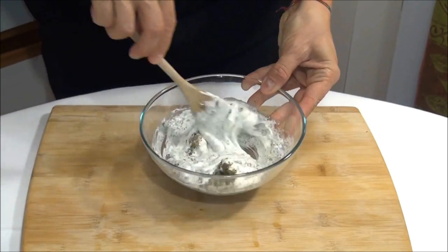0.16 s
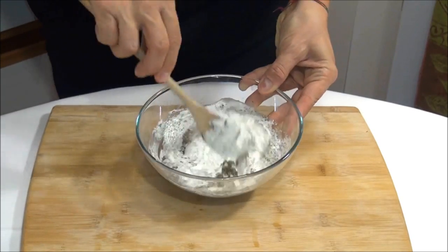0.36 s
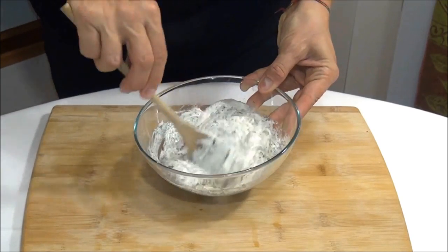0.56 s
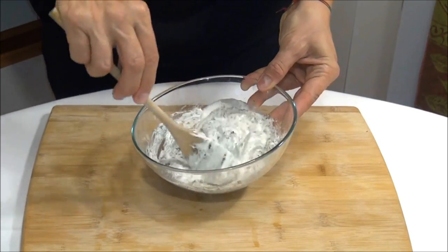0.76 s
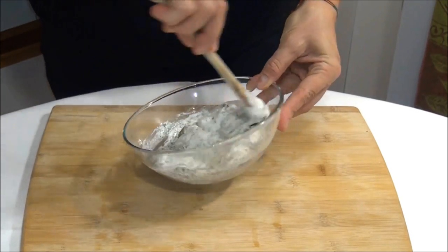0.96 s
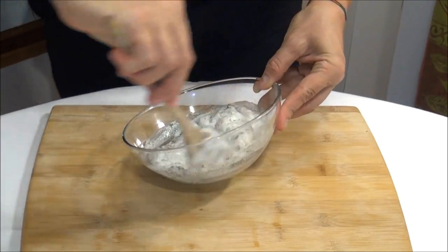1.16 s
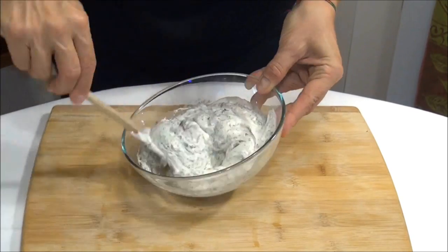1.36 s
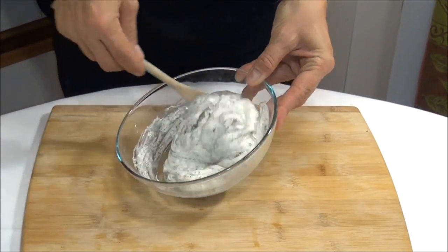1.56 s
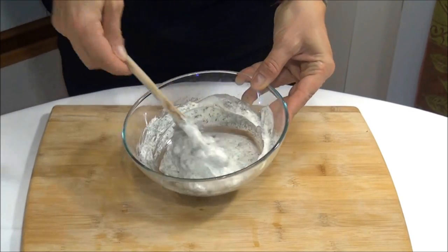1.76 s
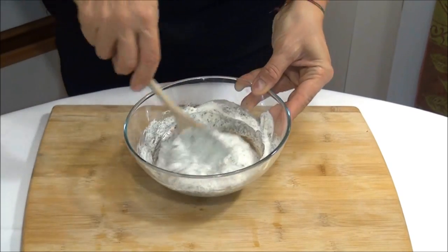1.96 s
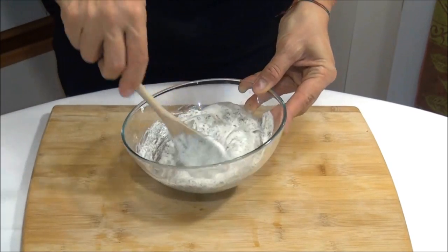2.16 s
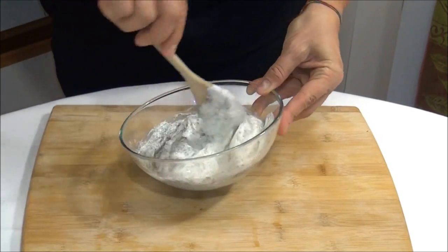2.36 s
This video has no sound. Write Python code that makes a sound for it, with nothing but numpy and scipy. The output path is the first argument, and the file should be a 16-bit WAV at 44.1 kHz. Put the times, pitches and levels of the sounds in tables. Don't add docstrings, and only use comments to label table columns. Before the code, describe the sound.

A wooden spoon knocks a filled glass bowl at uneven intervals, loudest early on, with dull board thumps, small wet smacks and faint dragging, close up in a small echoing kitchen over low hum.

```python
import sys
import numpy as np
from scipy import signal
from scipy.fft import rfft, irfft
from scipy.io import wavfile
from scipy.ndimage import uniform_filter1d

SR = 44100
rng = np.random.default_rng(int(sys.argv[2]) if len(sys.argv) > 2 else 0)


def amp(db):
    return 10 ** (np.asarray(db, float) / 20)


def write(x):
    x = np.atleast_2d(x).T
    wavfile.write(sys.argv[1], SR, np.round(np.clip(x, -1, 1) * 32767).astype(np.int16))


N = 110250

# [start_s, level_db (peak), pitch_hz (contact), board_db (thump), ring_cycles]
SPOON_KNOCKS = [(0.02, -45, 790, -9.5, 13.8), (0.0803, -40, 800, -7, 5.7), (0.1512, -31.5, 900, -19, 6),
                (0.3817, -46.5, 1140, -33, 15), (0.3866, -16.5, 1047, -28.5, 4.74),
                (.6145, -30, 826, -19, 4.2), (.651, -34.5, 900, -23, 2.3), (0.811, -31.5, 500, -15, 2.36),
                (0.879, -37, 1730, -30, 3.6), (1.045, -40.5, 726, -22, 4.3), (1.1922, -47, 1064, -38, 9.4),
                (1.376, -35.5, 1600, -19, 1.6), (2.0037, -32, 756, -14.5, 6.9),
                (2.068, -41, 1950, -51, 12.7), (2.2219, -24, 923, -27, 3.08), (2.361, -53, 725, -10, 6.9)]
# [pitch_hz, level_db, t60_s]
BOWL_MODES = [(645, -22, 0.016), (800, -28, 0.052), (815, 0.5, 0.05), (915, -2.5, 0.068), (1034, -7, 0.031),
              (1185.5, 3, 0.052), (1330, 4.5, 0.037), (1518, 1.5, 0.018), (1540, -19, 0.022),
              (1732, 7.5, 0.013), (2090, -19, 0.14)]
# [pitch_hz, level_db, t60_s]
BOARD_MODES = [(190, -10, .06), (231, 0, .11), (276, -4, .1), (380, -10, .07), (500, -4, .07)]
# [pitch_hz, level_db, t60_s]
RIM_MODES = [(2460, -27, .04), (3760, -42, .04), (5250, -26, .05), (6960, -27, .04), (8860, -32, .04),
             (10900, -36, .03)]
# [start_s, level_db (peak), centre_hz, width_octaves]
PASTE_SMACKS = [(0.019, -54.5, 10800, 0.39), (0.1507, -36.5, 9140, 1.04), (0.1511, -37.5, 2500, 1.42),
                (.162, -65, 9500, .6), (.176, -49, 12600, 0.35), (0.208, -56, 4430, 1.1),
                (0.3878, -22.5, 1660, 1.08), (.3865, -31, 5700, 1.23), (0.423, -55, 11500, 0.21),
                (0.435, -49.5, 7500, 0.71), (.654, -39, 2240, 0.66), (.692, -52, 7900, 0.65),
                (.811, -38, 2130, 0.7), (0.812, -45, 8700, 1.1), (0.881, -48.5, 2710, 0.99),
                (1.047, -44.5, 2480, 1.5), (1.375, -51, 5210, 0.18), (1.2985, -54, 11100, 0.56),
                (.3868, -37.5, 4300, 0.34), (1.322, -48, 9200, 0.82), (1.376, -32.5, 2060, 0.95),
                (1.546, -54, 4500, 0.97), (1.591, -49.5, 2900, 0.79), (1.655, -57, 11000, 0.52),
                (1.71, -52, 4560, 0.45), (2.054, -43, 7000, 5.1), (2.064, -41, 8400, 0.35),
                (2.0674, -27.5, 9000, 3.5), (2.068, -30.5, 7900, 10), (2.069, -37, 2250, 0.99),
                (2.2237, -32.5, 2340, 2.2), (2.36, -46, 6970, 2.4)]
# [start_s, length_s, rim_db, paste_db]
SPOON_SLIDES = [
    (0.146, 0.091, -90, -70),
    (0.803, 0.063, -85, -58.5),
    (1.194, 0.015, -67, -83),
    (1.245, 0.023, -60.5, -73),
    (1.275, 0.028, -66, -67),
    (2.059, 0.017, -90, -43),
    (2.363, 0.015, -89.5, -63),
]
# [start_s, level_db]
STIR_LEVEL = [(0.0, -56.5), (0.08, -67.5), (0.21, -65), (0.44, -80), (0.56, -66), (0.7, -81), (0.84, -71),
              (1.15, -77), (1.59, -64.5), (1.75, -73.5), (2.03, -85), (2.21, -69.5), (2.35, -65.5),
              (2.5, -79)]
# [pitch_hz, level_db per Hz]
DRAG_COLOUR = [(150, 4), (400, -5), (900, 2), (1600, -7), (3000, -10), (6000, -30)]
# [pitch_hz, level_db per Hz]
AIR_COLOUR = [(41, -24), (70, -17), (166, -10.5), (403, -15), (593, -20), (1000, -25.5), (1510, -26),
              (3040, -32.5), (16000, -38)]
# [pitch_hz, t60_s]
ROOM_DECAY = [(100, 1), (300, 0.33), (800, 0.35), (2000, 0.26), (5000, 0.27), (12000, 0.087)]
# [pitch_hz, left_minus_right_db]
STEREO_LEAN = [(60, -4.5), (130, -5), (290, 0.5), (640, 2.0), (1410, 1.0), (3100, 1.5), (6820, 1),
               (15000, 0.5)]
# [pitch_hz, level_db]
STEREO_WIDTH = [(100, -18.5), (1000, -23.5), (3500, -61), (5500, -12.5), (9000, -12.5), (11500, -19.5),
                (13000, -60)]
# [start_s, level_db (peak), pitch_hz, ring_cycles]
LONE_RINGS = [(.3866, -16, 815, 22), (.3905, -23, 930, 45), (.3875, -31, 227.4, 22), (.3875, -22, 1330, 39),
              (.392, -29, 1500, 77), (.3965, -37, 990, 6.9), (2.006, -32.5, 915, 55),
              (2.0085, -35, 665, 25), (2.011, -42.5, 1184, 98), (2.0125, -33, 800, 13),
              (2.075, -37, 1700, 33), (.083, -31.5, 890, 15.7), (.1, -34.5, 283, 24), (.046, -46, 252, 6),
              (.153, -25, 534, 8.3), (.158, -35.5, 1210, 73), (.2, -39, 450, 22), (.21, -45.5, 1152, 70),
              (.615, -37.5, 221, 17), (.651, -42, 851, 28), (.657, -35, 1158, 32), (.6535, -34.5, 2010, 27),
              (.66, -42, 228, 7.5), (1.38, -35, 915, 72), (1.383, -35, 1174, 40), (1.375, -37, 1709, 73),
              (1.382, -57, 246, 8), (1.403, -34.5, 238, 6), (2.2215, -31.5, 850, 21),
              (2.235, -40, 235, 18.6), (2.24, -53, 1050, 40), (1.046, -38.5, 1347, 38),
              (.0805, -29, 235, 27), (.811, -47, 2290, 86), (.88, -40.5, 1842, 120),
              (1.1905, -50, 2530, 49), (1.375, -36, 2400, 49), (2.2215, -32, 2465, 80),
              (2.36, -47, 2740, 41), (.07, -51, 129, 5.1), (.19, -46.5, 136.5, 68), (.40, -42.5, 152, 21),
              (.66, -44, 143, 10), (.83, -46, 146, 17), (1.39, -45, 134.4, 38), (2.03, -45, 139, 19),
              (2.25, -42.5, 143, 26)]

HUM_HZ, HUM_DB, HUM_WOBBLE_DB = 59.3, -58.5, 2.5
AIR_DB = -60
SLIPS_PER_S, CRACKLE_PER_S = 1800, 3100
CONTACT_DB, BODY_DB, BOARD_DB = 10, -14.5, 2
OFF_PITCH_DB = 11.0
DULL_DB = 4
SMACK_T60_S, SMACK_ROUGH = 0.009, 0.55
RINGS_ROOM_DB = -9
ROOM_DB, ROOM_ONSET_S = 3, 0.005
EARLY_DB, EARLY_T60_S = 10, 0.075
PLACES = 12
TOP_HZ = 15900


def rms_one(x):
    return x / np.sqrt(np.mean(x ** 2) + 1e-20)


def at_hz(points, hz):
    points = np.array(points)
    return np.interp(np.log(hz + 1), np.log(points[:, 0]), points[:, 1])


def colour(x, points, share=1):
    gain = amp(share * at_hz(points, np.fft.rfftfreq(N, 1 / SR)))
    return irfft(rfft(x) * gain, N)


def bandpass(x, edges, order=2):
    return signal.sosfilt(signal.butter(order, edges, "band", fs=SR, output="sos"), x)


def drift(rate_hz):
    r = np.exp(-2 * np.pi * rate_hz / SR)
    wander = signal.lfilter([1], [1, -2 * r, r * r], rng.standard_normal(N + SR))
    return rms_one(wander[SR:])


def grains(per_s):
    hits = rng.random(N) < per_s / SR
    sizes = amp(3.5 * np.minimum(rng.exponential(1, N), 3))
    return rms_one(hits * sizes * rng.choice([-1, 1], N))


def ring(clicks, hz, t60):
    r, w = amp(-60 / (t60 * SR)), 2 * np.pi * hz / SR
    return signal.lfilter([0, np.sin(w)], [1, -2 * r * np.cos(w), r * r], clicks + 1e-18)


def strike(modes, start_s, db_at, spread_db):
    out = 0
    chance = rng.standard_normal((len(start_s), len(modes)))
    for k, (hz, level_db, t60) in enumerate(modes):
        clicks = np.zeros(N)
        clicks[(start_s * SR).astype(int)] = amp(db_at(hz) + level_db + spread_db * chance[:, k])
        out = out + ring(clicks, hz, t60) * (-1) ** k
    return out


def blips(rows):
    size = 16384
    out, t = np.zeros(N + size), np.arange(size) / SR
    for s, db, hz, cycles in rows:
        swell = (1 - np.exp(-4.0 * hz * t)) ** 2
        decay = amp(-60 * hz * t / max(cycles, 1))
        out[int(s * SR):int(s * SR) + size] += amp(db) * swell * decay * np.sin(2 * np.pi * hz * t)
    return out[:N]


def air():
    return colour(rng.standard_normal(N), AIR_COLOUR)


def background():
    level = amp(HUM_DB + HUM_WOBBLE_DB * drift(27))
    phase = 2 * np.pi * HUM_HZ * np.arange(N) / SR + 1.0 * drift(0.96)
    low_cut = signal.butter(4, 70, "high", fs=SR, output="sos")
    return level * np.sin(phase) + amp(AIR_DB) * rms_one(signal.sosfilt(low_cut, air()))


def drag():
    s, db = np.transpose(STIR_LEVEL)
    effort_db = np.interp(np.arange(N) / SR, s, db) - 1.5 + 2 * drift(47)
    return amp(effort_db) * rms_one(colour(grains(3400), DRAG_COLOUR))


def smacks():
    size = 1024
    out, t = np.zeros(N + size), np.arange(size) / SR
    for s, db, hz, octaves in PASTE_SMACKS:
        edges = np.clip(hz * 2 ** (np.array([-0.5, 0.5]) * octaves), 100, 20000)
        noise = rng.standard_normal(size) * amp(-60 * t / SMACK_T60_S)
        puff = bandpass((t == 0) + SMACK_ROUGH / 4 * noise, edges, order=3)
        out[int(s * SR):int(s * SR) + size] += amp(db) * puff / np.abs(puff).max()
    return out[:N]


def knocks():
    s, db, pitch, board_db, cycles = np.transpose(SPOON_KNOCKS)

    def bowl_db(hz):
        octaves = np.log2(hz / pitch)
        return db + BODY_DB - OFF_PITCH_DB * np.abs(octaves) - DULL_DB * np.maximum(octaves, 0)

    contact = blips(zip(s, db + CONTACT_DB, pitch, cycles))
    body = strike(BOWL_MODES, s, bowl_db, spread_db=6.0)
    thump = strike(BOARD_MODES, s, lambda hz: db + board_db + BOARD_DB, spread_db=5)
    return contact + body + thump


def lone_rings():
    return blips(LONE_RINGS)


def slides():
    t, rim, paste = np.arange(N) / SR, 0, 0
    for s, length, rim_db, paste_db in SPOON_SLIDES:
        fade_in, fade_out = (t - s) / 0.004, (s + length - t) / (0.6 * length)
        gate = np.clip(np.minimum(fade_in, fade_out), 0, 1)
        rim = rim + amp(rim_db) * gate
        paste = paste + amp(paste_db) * gate
    slips = grains(SLIPS_PER_S) * rim
    sing = sum(amp(db) * ring(slips, hz, t60) for hz, db, t60 in RIM_MODES)
    crackle = bandpass(grains(CRACKLE_PER_S), [4000, 11000])
    return amp(2.0) * sing + paste * crackle


def echoes():
    t, tail = np.arange(SR // 2) / SR, 0
    edges = 80 * 2 ** np.arange(0, 8, 0.5)
    for low, high in zip(edges, edges[1:]):
        band = bandpass(rng.standard_normal(len(t)), [low, high])
        tail = tail + band * amp(-60 * t / at_hz(ROOM_DECAY, np.sqrt(low * high)))
    spectrum = rfft(tail * (1 + amp(EARLY_DB - 60 * t / EARLY_T60_S)))
    smooth_power = uniform_filter1d(np.abs(spectrum) ** 2, size=25)
    tail = irfft(spectrum / np.sqrt(smooth_power + 1e-9), len(t))
    tail = tail * np.clip(t / ROOM_ONSET_S - 0.5, 0, 1) * (t < 0.45)
    return tail / np.sqrt(np.sum(tail ** 2))


def kitchen(x):
    place = np.linspace(0, PLACES, N)
    x = colour(x, [(230, -4), (600, -1.5), (900, -2), (1500, -0.5)])
    wet = 0
    for k in range(PLACES + 1):
        nearness = np.clip(1 - np.abs(place - k), 0, 1)
        wet = wet + signal.fftconvolve(x * nearness, echoes())[:N]
    return amp(ROOM_DB) * wet


def scene():
    bowl = knocks() + smacks() + slides() + drag()
    rings = lone_rings()
    mid = bowl + rings + kitchen(bowl + amp(RINGS_ROOM_DB) * rings) + background()
    side = colour(kitchen(bowl + rings) + amp(AIR_DB) * rms_one(air()), STEREO_WIDTH)
    left = colour(mid, STEREO_LEAN, 0.65) + side
    right = colour(mid, STEREO_LEAN, -0.43) - side
    return np.array([left, right])


def roll_off(x):
    return signal.sosfilt(signal.butter(12, 16470, fs=SR, output="sos"), x)


def record(dry):
    low_cut = signal.butter(3, 45, "high", fs=SR, output="sos")
    top_cut = signal.cheby2(10, 50, TOP_HZ + 700, fs=SR, output="sos")
    mix = signal.sosfilt(top_cut, signal.sosfilt(low_cut, dry))
    return roll_off(mix)


dry = scene()
out = record(dry)
write(out)
```